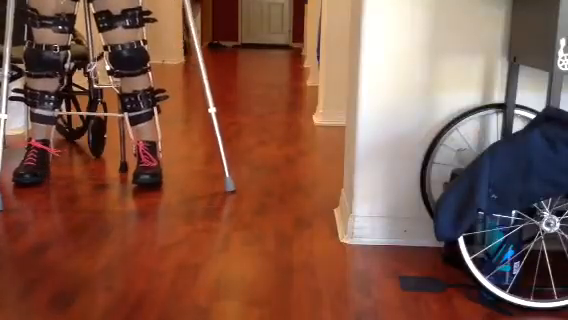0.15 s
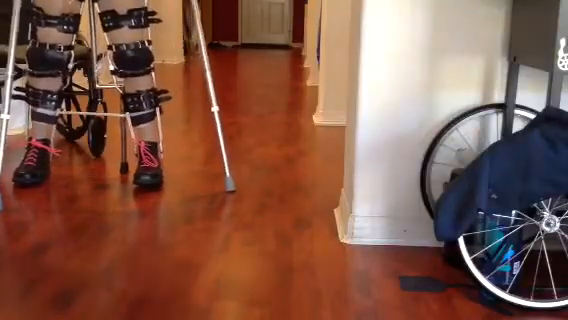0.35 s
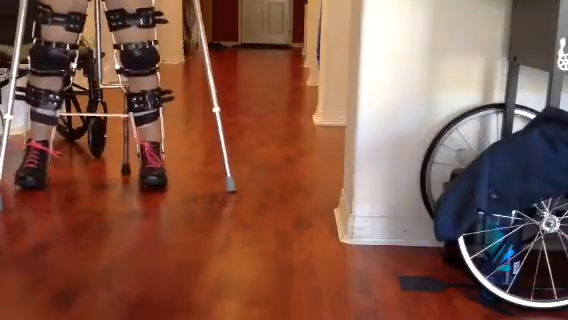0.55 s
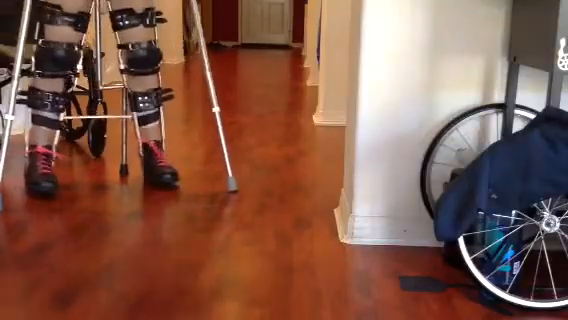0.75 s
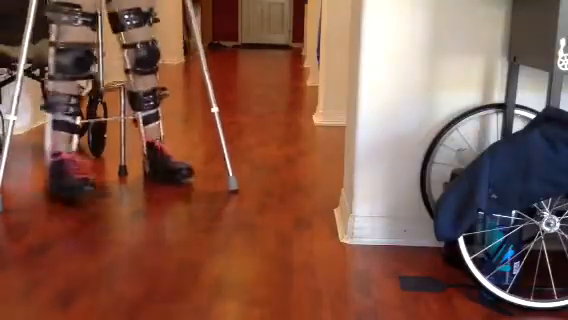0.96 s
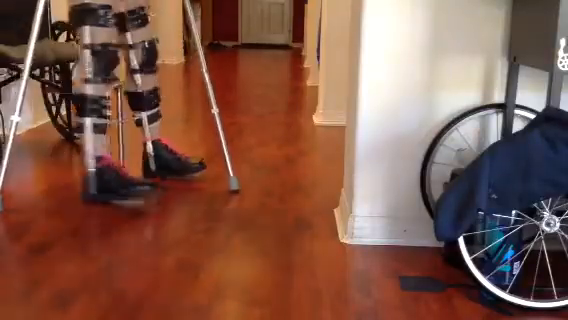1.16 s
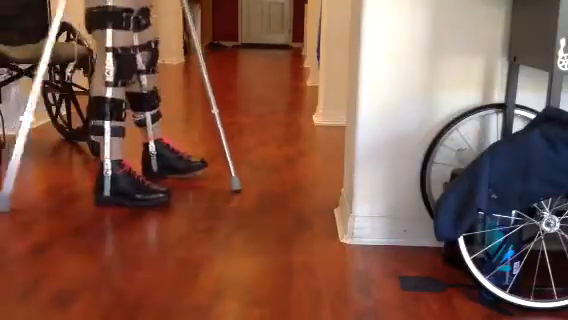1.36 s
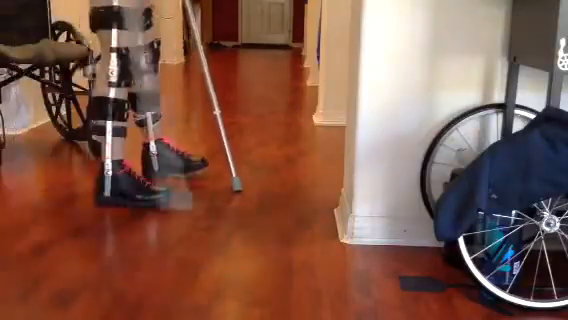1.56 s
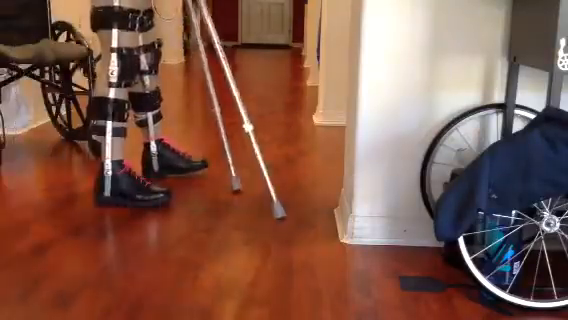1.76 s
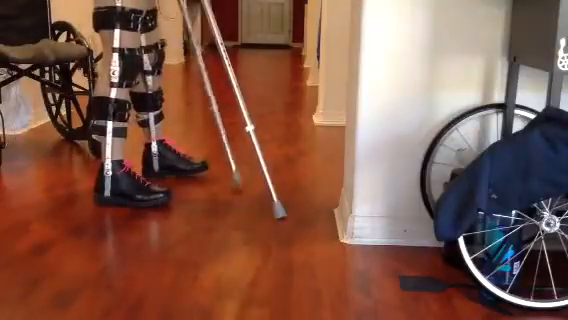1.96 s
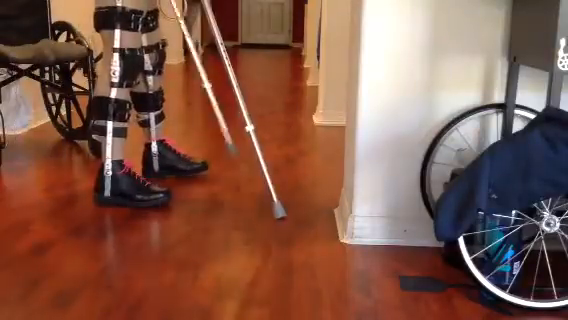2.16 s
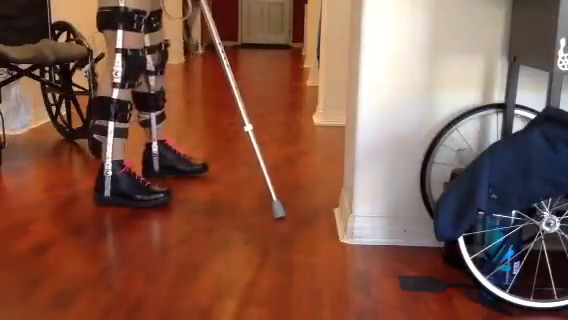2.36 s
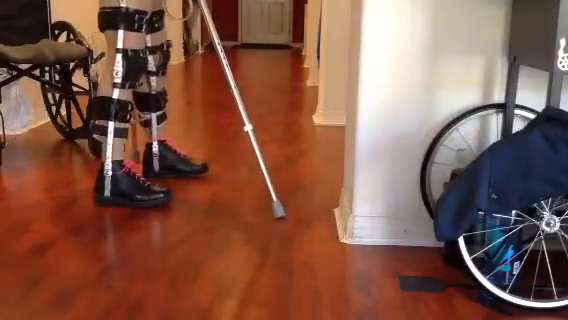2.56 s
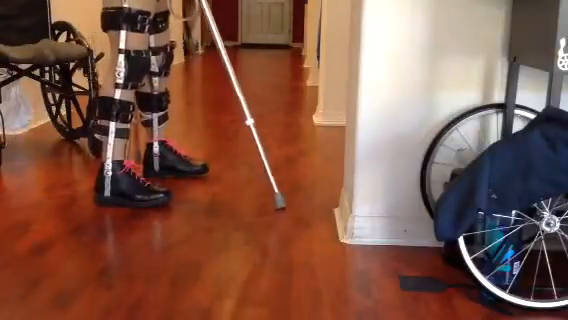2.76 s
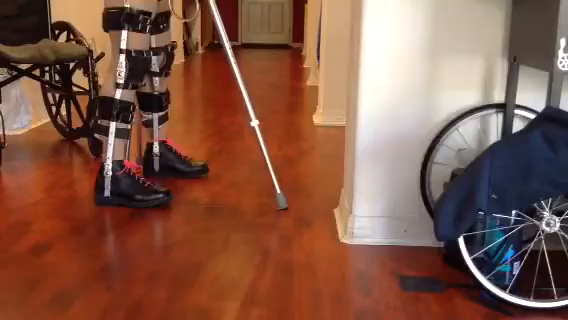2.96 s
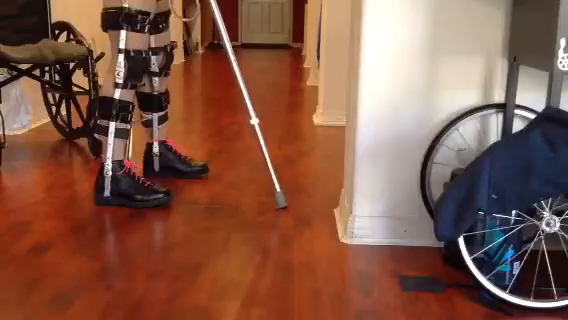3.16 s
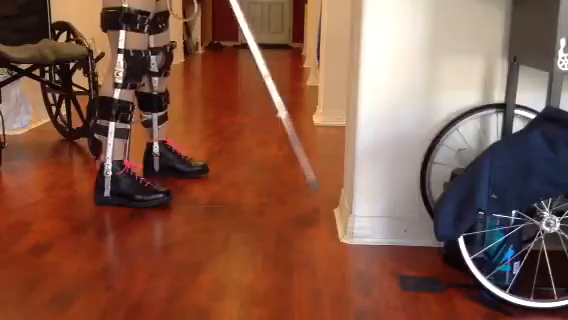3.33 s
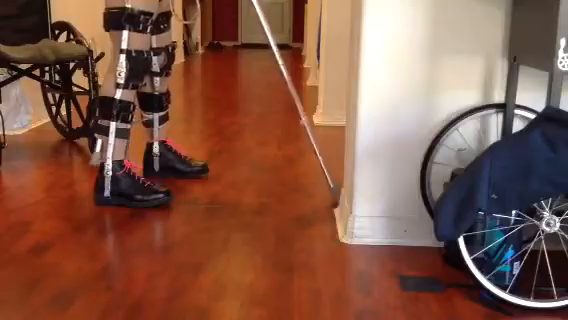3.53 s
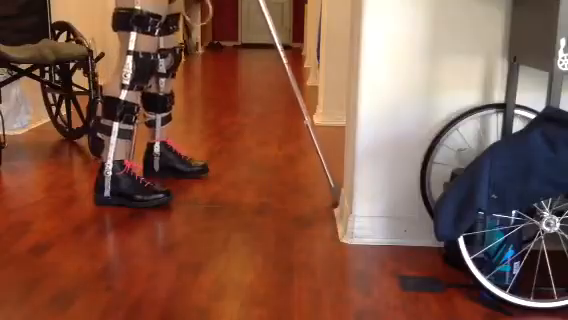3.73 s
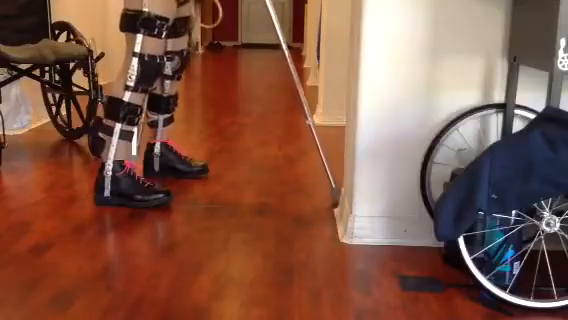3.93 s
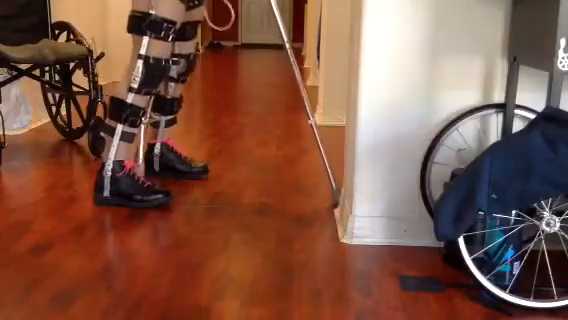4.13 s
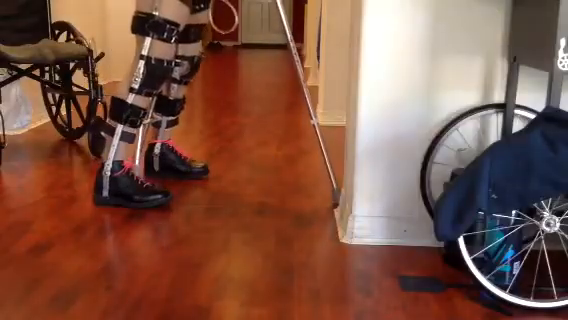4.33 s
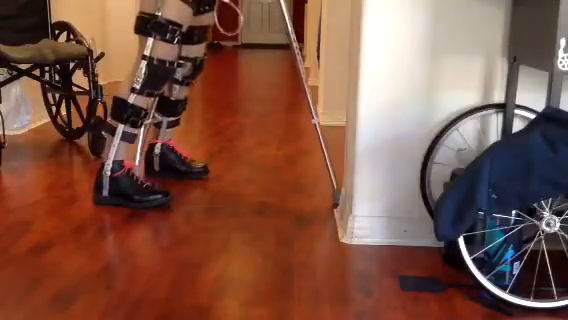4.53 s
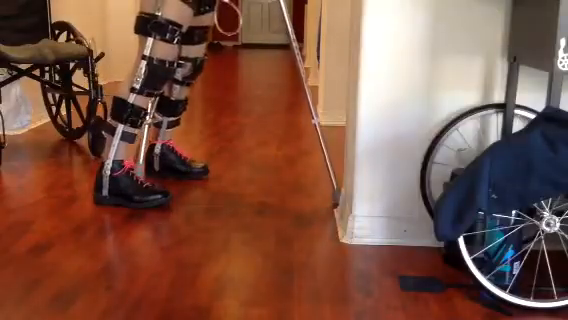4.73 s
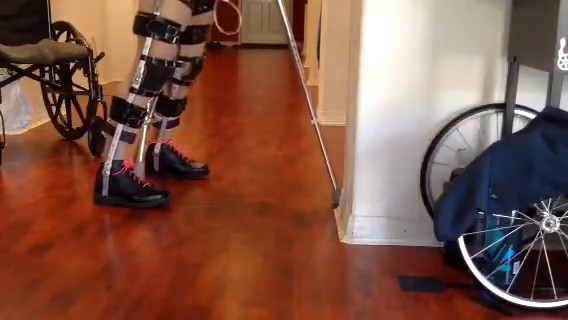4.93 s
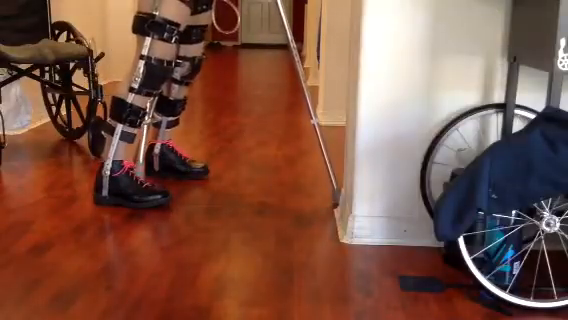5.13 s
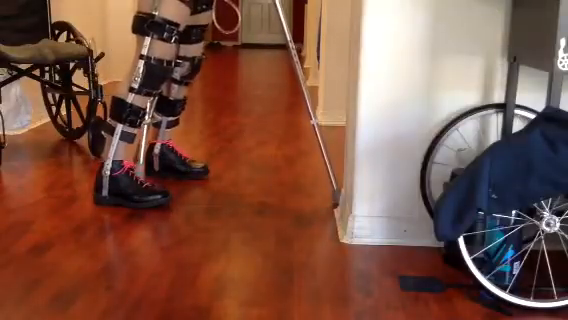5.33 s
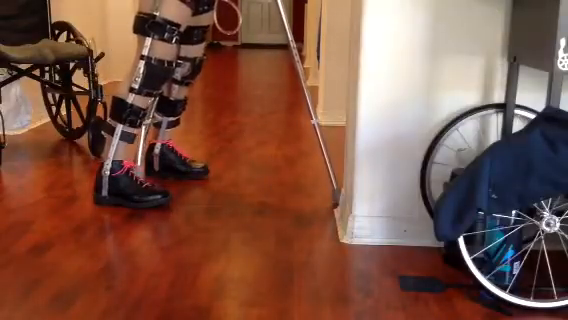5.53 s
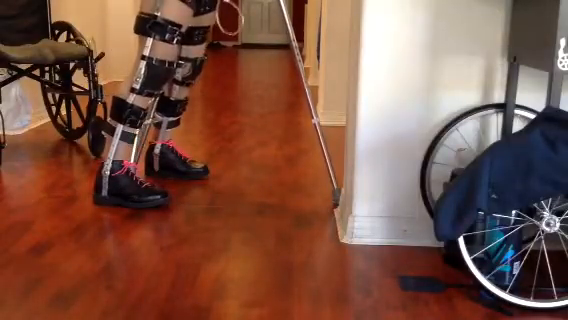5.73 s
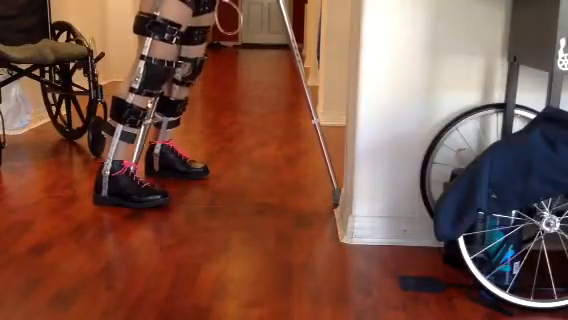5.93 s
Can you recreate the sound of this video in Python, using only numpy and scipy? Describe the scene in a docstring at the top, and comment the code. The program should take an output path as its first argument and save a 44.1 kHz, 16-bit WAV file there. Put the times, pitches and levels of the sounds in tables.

```python
"""Steel leg braces clank as someone takes slow steps on aluminium crutches down a bare hallway.
A braced shoe lands on the hardwood and shakes the uprights and the lock; the crutch tubes click in
their sleeves and the rubber tips thud. Straps rub and buckles tick as the weight shifts.
One small microphone near the floor hears the hallway ring after each sound, over air and a faint hum."""
import sys
import numpy as np
from scipy import signal
from scipy.fft import rfft, irfft, next_fast_len
from scipy.io import wavfile
from scipy.ndimage import map_coordinates

SR = 44100
rng = np.random.default_rng(int(sys.argv[2]) if len(sys.argv) > 2 else 0)


def master_out(mix):
    """Clip the mix to full scale and print it as 16-bit PCM to the path in sys.argv[1]."""
    frames = np.transpose(np.atleast_2d(mix))
    ceiling = np.clip(frames, -1, 1)
    pcm = np.round(ceiling * 32767).astype(np.int16)
    wavfile.write(sys.argv[1], SR, pcm)


N = 268569
T = np.arange(int(.8 * SR)) / SR  # time axis of one sound [s]
HZ = np.fft.rfftfreq(2 ** 14, 1 / SR)  # frequency axis of a filter [Hz]


def amp(db):
    """Decibels to gain."""
    return 10 ** (np.asarray(db) / 20)


def unit_rms(x):
    """Scale to rms 1."""
    return x / np.sqrt(np.mean(x ** 2) + 1e-20)


def unit_energy(x):
    """Scale to energy 1."""
    return x / (np.linalg.norm(x) + 1e-20)


def curve(points, hz=HZ):
    """Join (Hz, value) points along a log frequency axis."""
    point_hz, values = np.transpose(points)
    return np.interp(np.log(hz + 1), np.log(point_hz + 1), values)


def resonances(modes):
    """The dB that a set of modes adds at each frequency."""
    return sum(db / (1 + (2 * (HZ - hz) / width) ** 2) for hz, width, db in modes)


def coloured(x, db):
    """Pass x through the minimum-phase filter with this dB response."""
    cepstrum = irfft(np.log(np.maximum(amp(db), 1e-6)))
    half = len(cepstrum) // 2
    cepstrum[1:half] *= 2
    cepstrum[half + 1:] = 0
    impulse = irfft(np.exp(rfft(cepstrum)))[:half]
    return signal.fftconvolve(x, impulse)[:len(x)]


def add(track, start_s, x):
    """Mix x into the track at start_s."""
    part = track[max(round(start_s * SR), 0):][:len(x)]
    part += x[:len(part)]


# how long the bare hallway rings: (frequency [Hz], t60 [s])
HALL_DECAY = [(150, 0.37), (500, 0.94), (1500, 0.77), (4500, 0.75), (9000, 0.6), (15000, 0.39)]

def hallway(build_s=0.0033, hold_s=0.022, wall_s=.0245, wall_db=-14, slaps_db=-9):
    """The hallway's answer at the microphone, new each time: early slaps, facing wall, diffuse tail."""
    hz, t, noise = signal.stft(rng.standard_normal(len(T)), SR, nperseg=256)
    fade = amp(-60 * np.maximum(t - hold_s, 0) / curve(HALL_DECAY, hz)[:, None])
    tail = signal.istft(noise * fade, SR, nperseg=256)[1][:len(T)]
    tail *= 1 - np.exp(-T / build_s)
    slaps = np.zeros(len(T))
    for delay_s in rng.uniform(.004, .06, size=14):
        add(slaps, delay_s, rng.standard_normal(size=24))
    answer = unit_energy(tail) + amp(slaps_db) * unit_energy(slaps)
    add(answer, wall_s, amp(wall_db) * unit_energy(rng.standard_normal(size=48)))
    return unit_energy(answer)


def contact(direct_db, t60):
    """Two surfaces chatter briefly; the direct sound reaches the microphone and the hallway follows."""
    burst = rng.standard_normal(len(T)) * amp(-60 * T / t60) * (1 - np.exp(-T / 0.00079))
    return amp(direct_db) * unit_energy(burst) + hallway()


# air in the hallway, all around the microphone: (frequency [Hz], relative level [dB])
AIR_COLOUR = [(30, -19), (100, -7.5), (180, 0), (270, -3), (400, -6), (750, -14), (1500, -16.5),
              (4500, -22), (13000, -22), (15500, -25.5)]

def room_tone(air_db=-62.5, hum_hz=275.8, hum_db=-75):
    """Steady indoor air with a faint, wavering appliance hum."""
    t = np.arange(N) / SR
    air = coloured(rng.standard_normal(N), curve(AIR_COLOUR))
    drift = map_coordinates(rng.standard_normal(size=64), [t * 5], mode="mirror")
    hum = np.sin(2 * np.pi * hum_hz * t + 0.84 * drift)
    return amp(air_db) * unit_rms(air) + amp(hum_db) * unit_rms(hum)


# spectrum of straps sliding on uprights: (frequency [Hz], relative level [dB])
RUB_COLOUR = [(120, -49), (200, -9.5), (358, -5.5), (399, -13), (446, -4), (690, -4.5), (1010, 1.5),
              (2130, -0.5), (3750, -4.5), (4580, -4.5), (11000, -20), (12500, -25), (15500, -28)]
# resonances of the rubbed fittings: (frequency [Hz], width [Hz], lift [dB])
STRAP_MODES = [(1760, 740, 4.5), (2630, 340, 3), (4370, 420, 1.5), (12180, 170, 8), (12700, 180, 10)]
# one stroke for each shift of weight: (time [s], length [s], level [dB], treble lift [dB])
RUBS = [(0.0, 0.025, -58.5, 0.5), (.331, 0.42, -64, 0), (0.795, 0.35, -64.5, -1.5),
        (2.669, 0.057, -63.5, -29), (3.234, 0.037, -53, 7), (3.419, 0.089, -55, 3),
        (3.553, 0.073, -53.5, 3), (3.797, 0.203, -58, 2), (4.414, 0.057, -49.5, -2.5),
        (4.514, 0.087, -53, 0), (4.643, 0.056, -49.5, 1), (4.762, 0.041, -42, -2), (4.796, 0.047, -41, 5.5),
        (5.035, 0.037, -53, 0), (5.095, 0.16, -47, 3), (5.864, 0.066, -61.5, 3)]

def strap_rubs(grain_db=5, catch_db=3, direct_db=-6, attack_s=0.0046, release_s=0.013):
    """Leather and steel slide in tiny slips that catch and let go, and faintly sing in the lock."""
    out = np.zeros(N)
    colour = curve(RUB_COLOUR) + resonances(STRAP_MODES)
    for start_s, length_s, db, treble_db in RUBS:
        grains = np.repeat(rng.standard_normal(len(T)), 40)[:len(T)]  # about 1 ms each
        catches = map_coordinates(rng.standard_normal(size=200), [T * 90], mode="mirror")
        slips = rng.standard_normal(len(T)) * amp(grain_db * grains + catch_db * catches)
        pressure = np.clip(np.minimum(T / attack_s, (length_s - T) / release_s), 0, 1)
        room = hallway()
        room[0] += amp(direct_db)
        treble = curve([(1500, 0), (6000, treble_db)])
        stroke = coloured(signal.fftconvolve(pressure * slips, room), colour + treble)
        add(out, start_s, amp(db) * np.sqrt(length_s * SR) * unit_energy(stroke))
    return out


# spectrum of a buckle tick: (frequency [Hz], level [dB])
TICK_COLOUR = [(50, -20), (400, 4), (1600, -6), (4700, -16), (9500, -1), (15000, -7)]
# ticks of the strap buckles: (time [s], level [dB])
TICKS = [(.134, -23.5), (1.845, -18), (2.667, -26.5), (3.825, -23), (3.86, -20)]

def buckle_ticks(level_db=-1, direct_db=3):
    """Buckles give thin ticks, heard more directly than by way of the walls."""
    out = np.zeros(N)
    for start_s, db in TICKS:
        tick = unit_energy(contact(direct_db, t60=0.011))
        add(out, start_s, amp(db) * coloured(tick, curve(TICK_COLOUR)))
    return amp(level_db) * out


# spectrum of a hard crutch click: (frequency [Hz], level [dB])
CLICK_COLOUR = [(50, -39), (170, -7), (400, -8.5), (900, -6.5), (1600, 0), (4700, -1), (9500, 1),
                (15000, -1.5)]
# resonances of the aluminium tubes: (frequency [Hz], width [Hz], lift [dB])
TUBE_MODES = [(1690, 520, 4), (2320, 490, -3.5), (3450, 240, 0), (4750, 120, 4), (5950, 190, 4.5),
              (6700, 960, -1), (8600, 260, 3), (10700, 450, 3.5)]
# a tube meets its stop, the harder the brighter: (time [s], level [dB], treble reach [Hz])
CLICKS = [(.327, -12.5, 1700), (0.4471, -13.5, 10300), (1.979, -7.5, 4160), (2.286, -27, 4400),
          (2.774, -9, 11900), (2.847, -9, 14000), (3.087, -14.5, 2580), (3.644, -11.5, 8250),
          (3.792, -13, 3370), (4.0192, -10.5, 14900), (4.065, -1, 1900), (4.329, -10.5, 4500),
          (5.526, -7, 2950)]

def crutch_clicks(level_db=-1, direct_db=-2, hard_hz=10000, blunt_db_per_octave=2.0, rolloff=3.8):
    """Loose tubes snap against their stops; a softer contact loses its treble and its sharp start."""
    out = np.zeros(N)
    colour = curve(CLICK_COLOUR) + resonances(TUBE_MODES)
    for start_s, db, reach_hz in CLICKS:
        blunt_db = blunt_db_per_octave * np.log2(hard_hz / reach_hz)
        snap = unit_energy(contact(direct_db - blunt_db, t60=0.013))
        treble_loss_db = 10 * np.log10(1 + (HZ / reach_hz) ** rolloff)
        add(out, start_s, amp(db) * coloured(snap, colour - treble_loss_db))
    return amp(level_db) * out


# spectrum of the sole on the boards: (frequency [Hz], level [dB])
SHOE_COLOUR = [(40, -20), (90, -17.5), (170, 0.5), (400, 0.5)]
# spectrum of the struck steel: (frequency [Hz], level [dB])
STEEL_COLOUR = [(1600, -2), (4700, -8.5), (9500, -11), (15000, -23)]
# resonances of the brace uprights: (frequency [Hz], width [Hz], lift [dB])
UPRIGHT_MODES = [(665, 91, -2.5), (1200, 41, 1), (1350, 70, 4), (1540, 33, 1), (2396, 31, 8), (2577, 18, 2),
                 (4240, 39, 6.5), (7200, 2200, -4), (10100, 92, 9)]
# ring of the brace lock: (frequency [Hz], level [dB], t60 [s])
LOCK_MODES = [(11580, -16, .05), (12095, 0, .13), (12625, 0, .1), (14355, 0, .06)]
# a braced leg lands or takes weight: (time [s], steel level [dB], shoe level [dB], tilt [dB/octave],
# clack [Hz], low ping [Hz], high ping [Hz], lock level [dB], lock centre [Hz])
CLANKS = [(1.1213, 8, 5, 0.2, 1180, 1694, 6750, 4.5, 12680),
          (1.285, 4.5, -12, 3.5, 1720, 1210, 7500, 0.5, 11900),
          (3.259, -10, -46, -1.2, 2400, 4550, 5800, -27.5, 11900),
          (4.07, 7, -3, 1.55, 2070, 3090, 8450, -18, 12000),
          (5.9531, 5, -1.5, 0.5, 1340, 2610, 9500, -31, 12200),
          (5.9761, 3.5, -8, -1.9, 1400, 2600, 9100, -30, 12400)]

def brace_clanks(ring_db=-1, spread_hz=480, clack_db=6, ping_db=7, direct_db=-7.5):
    """Each clank knocks the shoe and shakes the uprights; where it strikes decides which modes ring."""
    out = np.zeros(N)
    pivot_hz = STEEL_COLOUR[0][0]
    for start_s, steel_db, shoe_db, tilt, clack_hz, low_hz, high_hz, lock_db, lock_hz in CLANKS:
        hit = contact(direct_db, t60=0.012)
        shoe = [(hz, db + shoe_db) for hz, db in SHOE_COLOUR]
        steel = [(hz, db + steel_db + tilt * np.log2(hz / pivot_hz)) for hz, db in STEEL_COLOUR]
        struck_modes = [(clack_hz, 380, clack_db), (low_hz, 200, ping_db), (high_hz, 340, ping_db)]
        colour = curve(shoe + steel) + resonances(UPRIGHT_MODES) + resonances(struck_modes)
        add(out, start_s, coloured(hit, colour))
        for hz, db, t60 in LOCK_MODES:
            mode = np.sin(2 * np.pi * hz * T) * amp(-60 * T / t60)
            ring = unit_energy(signal.fftconvolve(hit, mode)[:len(T)])
            share = 1 / (1 + ((hz - lock_hz) / spread_hz) ** 2)  # modes near the centre get the most
            add(out, start_s, share * amp(ring_db + lock_db + db) * ring)
    return out


# resonances of the hardwood under the microphone: (frequency [Hz], width [Hz], lift [dB])
BOARD_MODES = [(152, 74, 3.5), (235, 130, 4.5), (444, 150, 2), (585, 29, -2.5)]
# rubber tips and soles set down on the boards: (time [s], boom level [dB], knock level [dB])
THUDS = [(1.839, -4.5, 3), (2.54, -12.5, -9.5), (3.085, -4, -12.5), (3.589, -10.5, -7), (3.863, -14, -4)]

def tip_thuds(level_db=-1, settle_s=0.82, push_db=3.5):
    """Rubber pushes and damps the boards, so only low modes answer; a heavier landing starts sharper."""
    out = np.zeros(N)
    for start_s, boom_db, knock_db in THUDS:
        push = unit_energy(hallway() * amp(-60 * T / settle_s))
        push[0] += amp(push_db + boom_db)  # straight to the microphone
        boom = [(40, boom_db - 19), (90, boom_db - 8), (160, boom_db), (260, boom_db - 1)]
        knock = [(400, knock_db), (620, knock_db - 3), (950, knock_db - 19), (3000, knock_db - 38)]
        colour = curve(boom + knock + [(9000, -57)]) + resonances(BOARD_MODES)
        add(out, start_s, coloured(push, colour))
    return amp(level_db) * out


def scene():
    """All sources at one microphone near the hallway floor."""
    walker = brace_clanks() + crutch_clicks() + buckle_ticks() + tip_thuds() + strap_rubs()
    return (walker + room_tone())[None]


def record(dry, low_cut_hz=125, top_hz=15500):
    """The small microphone sheds the bass, and nothing above the band limit is kept."""
    low_cut = signal.butter(2, low_cut_hz, "highpass", fs=SR, output="sos")
    thin = signal.sosfilt(low_cut, dry)
    size = next_fast_len(N + SR // 2)
    in_band = np.fft.rfftfreq(size, 1 / SR) < top_hz
    return irfft(rfft(thin, size) * in_band, size)[..., :N]


dry = scene()
out = record(dry)
master_out(out)
```